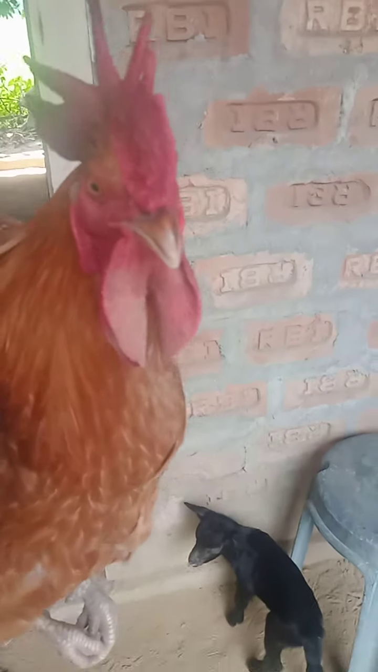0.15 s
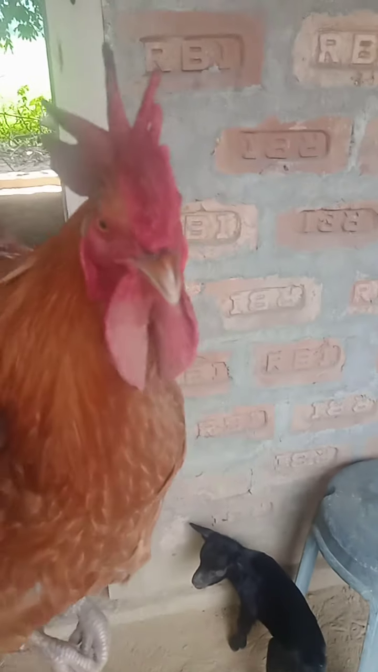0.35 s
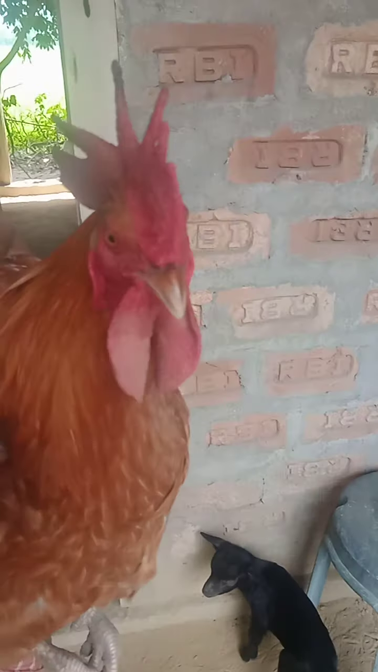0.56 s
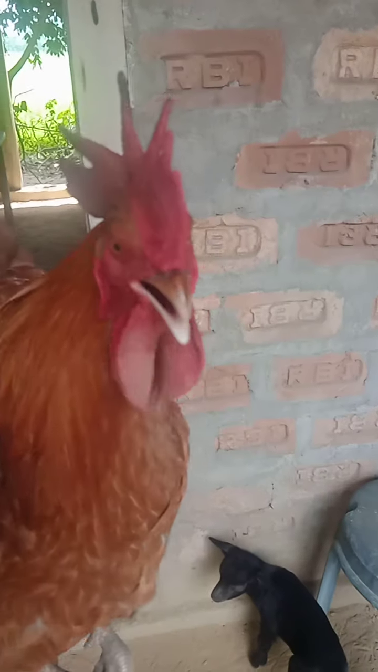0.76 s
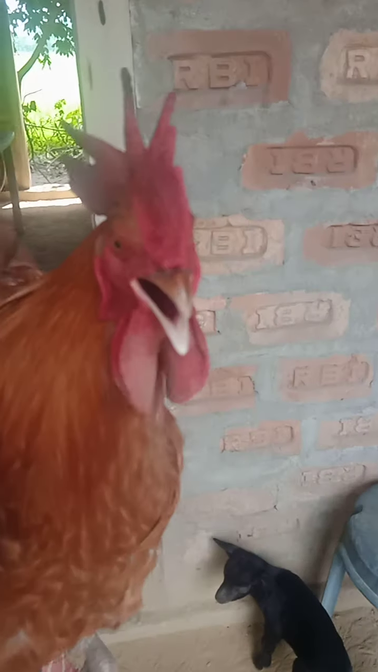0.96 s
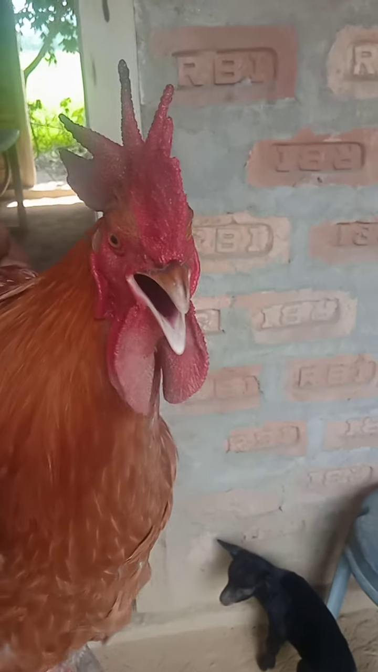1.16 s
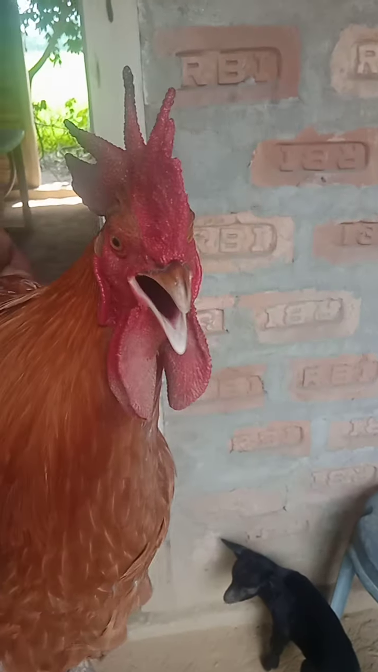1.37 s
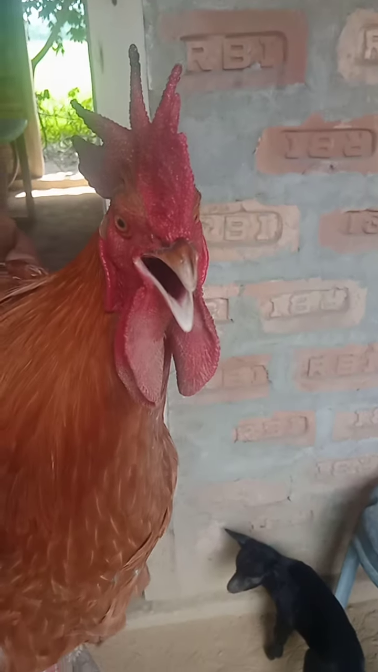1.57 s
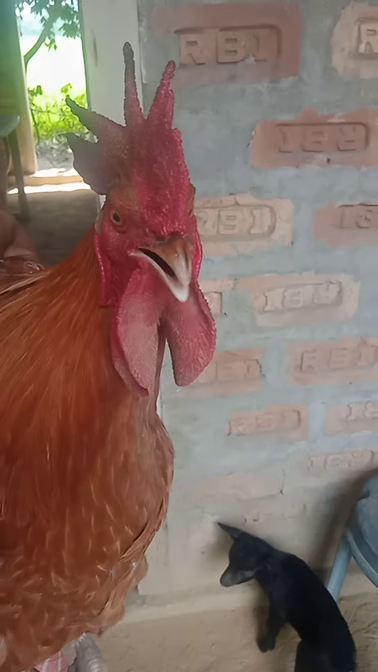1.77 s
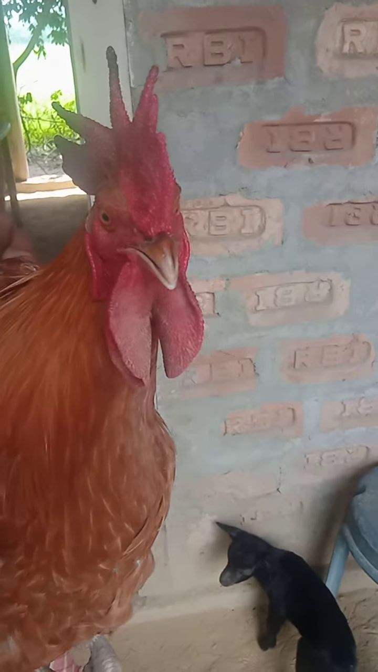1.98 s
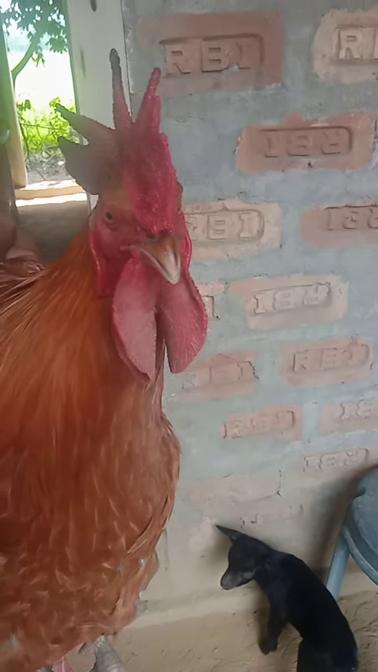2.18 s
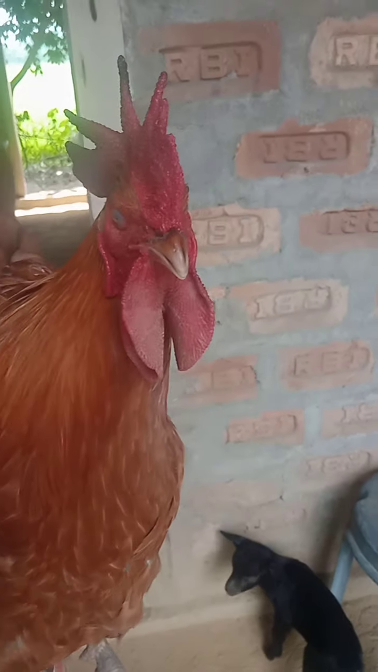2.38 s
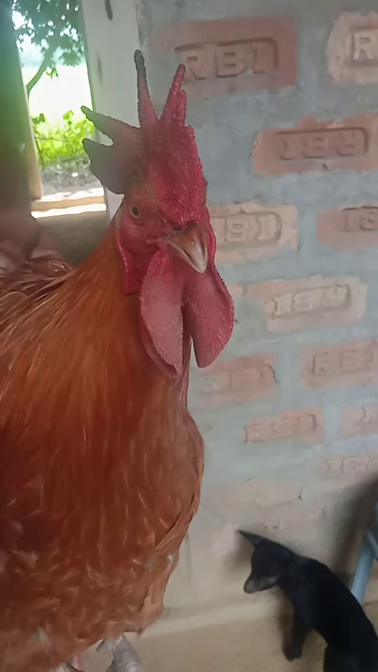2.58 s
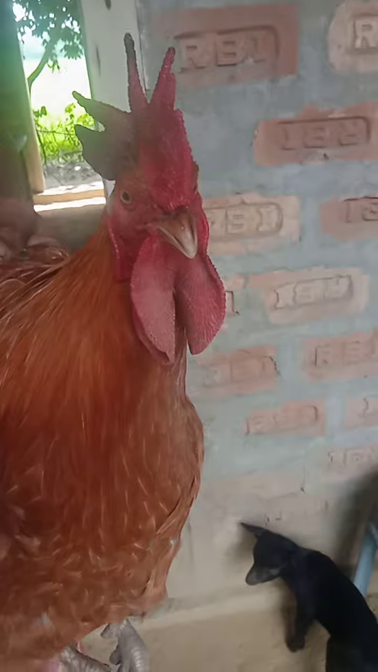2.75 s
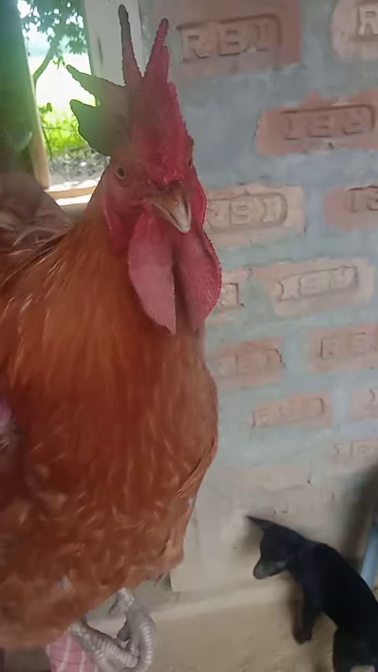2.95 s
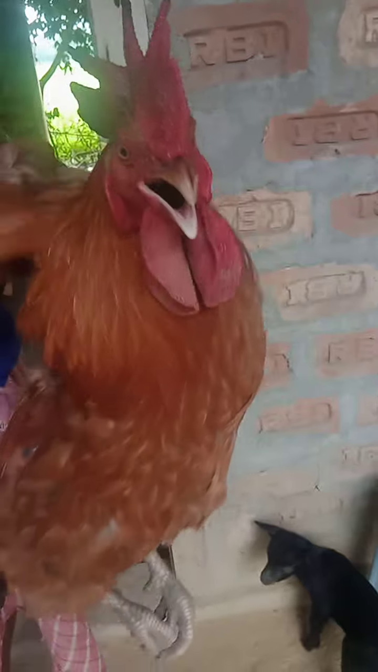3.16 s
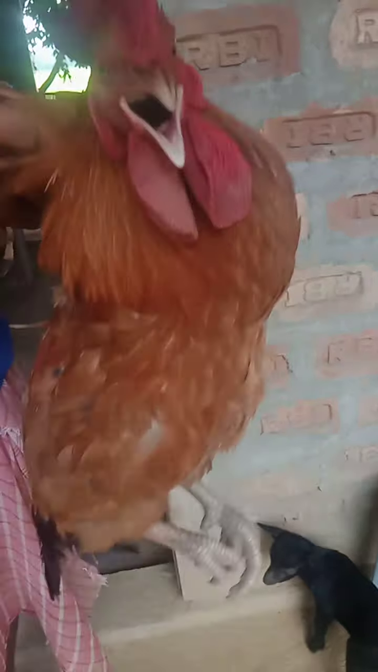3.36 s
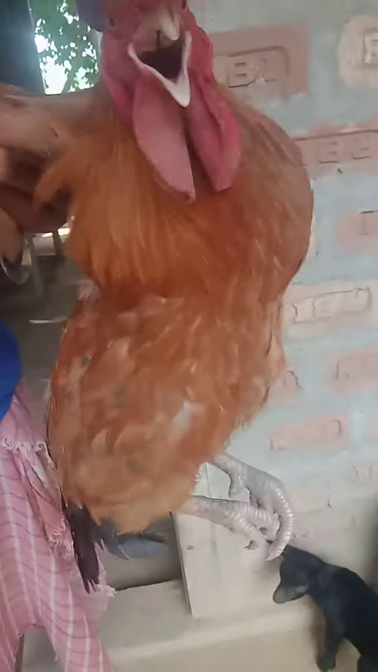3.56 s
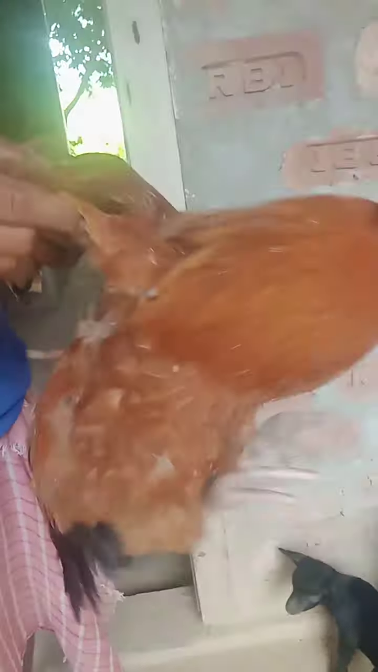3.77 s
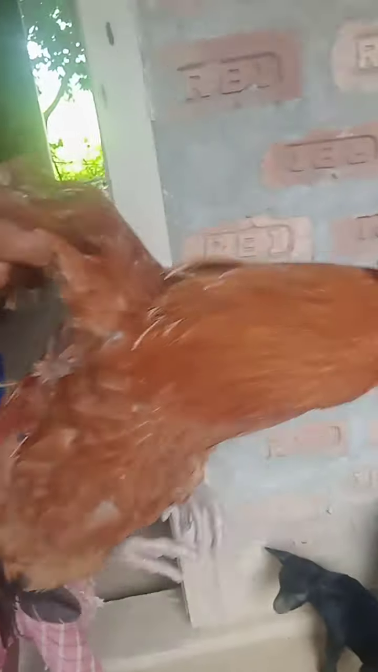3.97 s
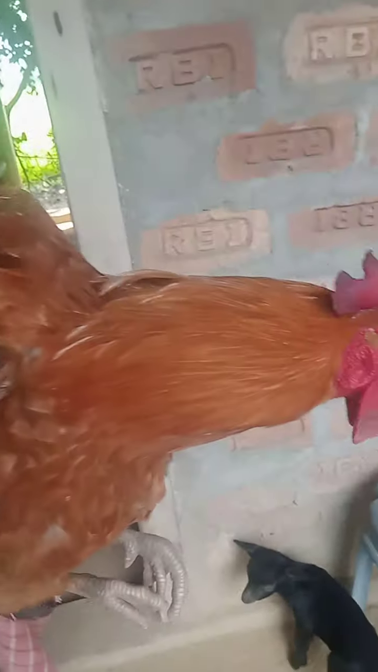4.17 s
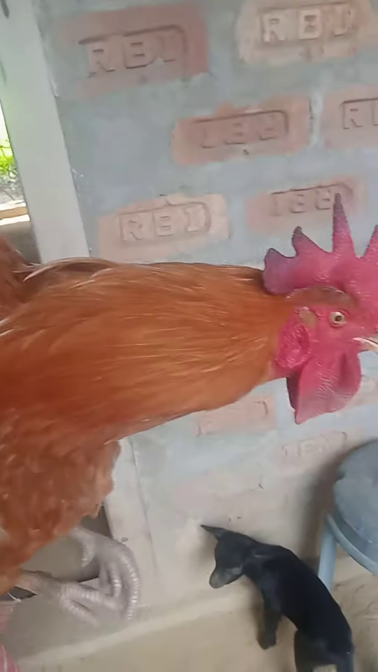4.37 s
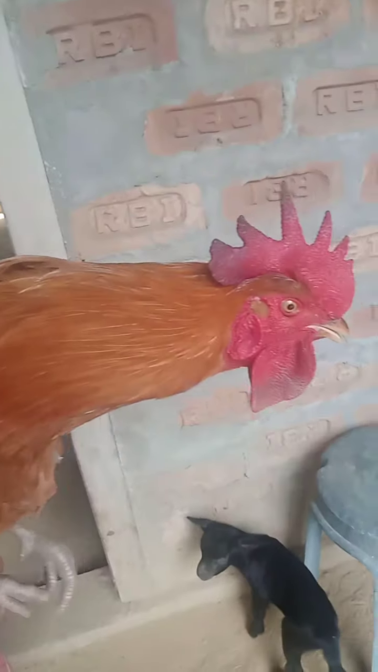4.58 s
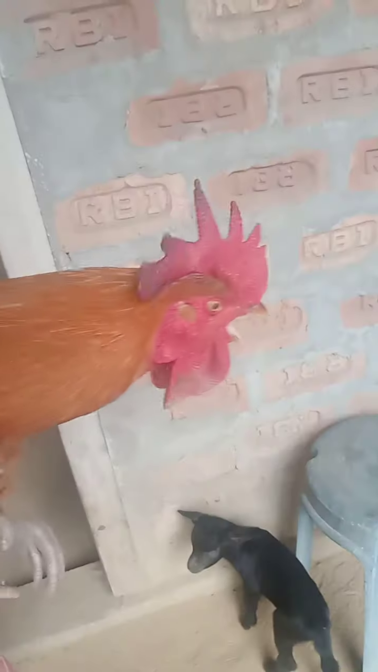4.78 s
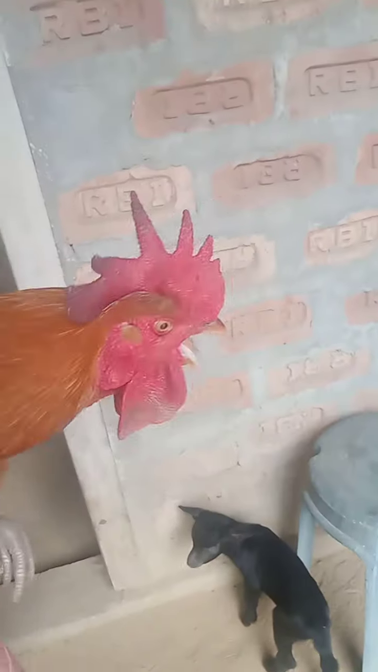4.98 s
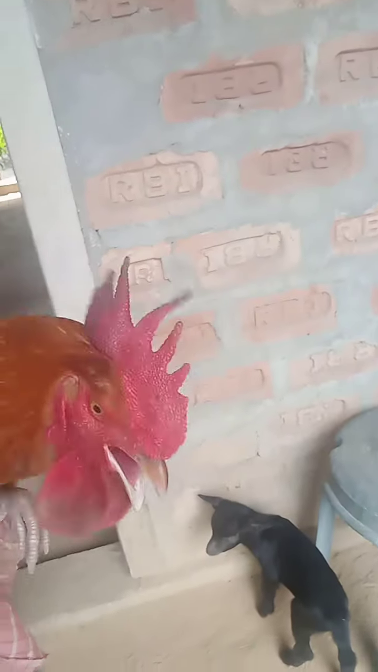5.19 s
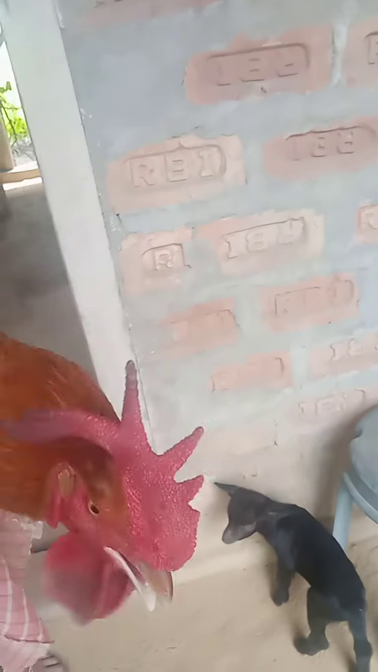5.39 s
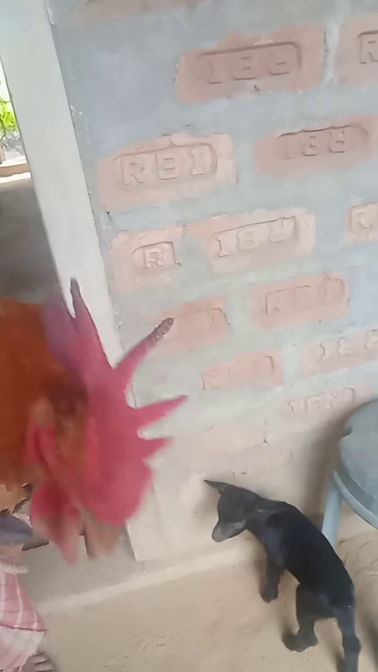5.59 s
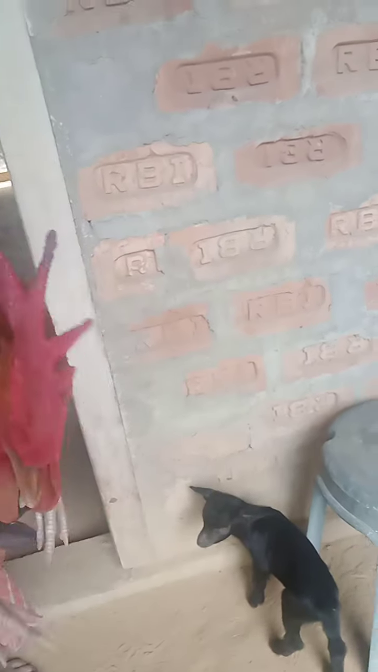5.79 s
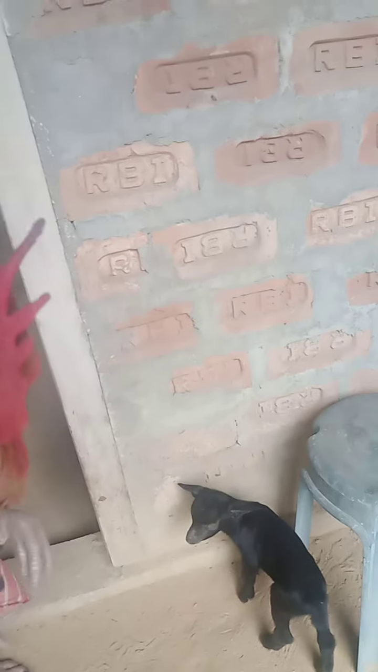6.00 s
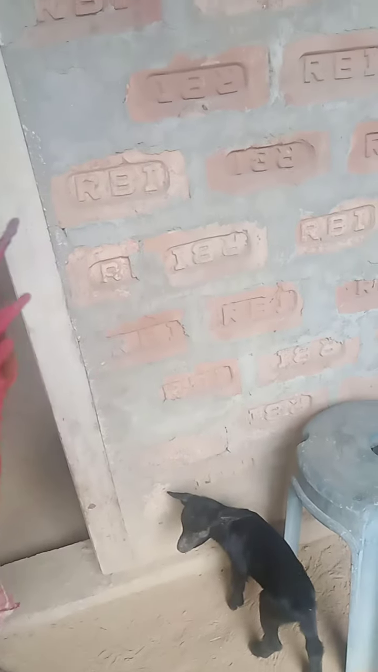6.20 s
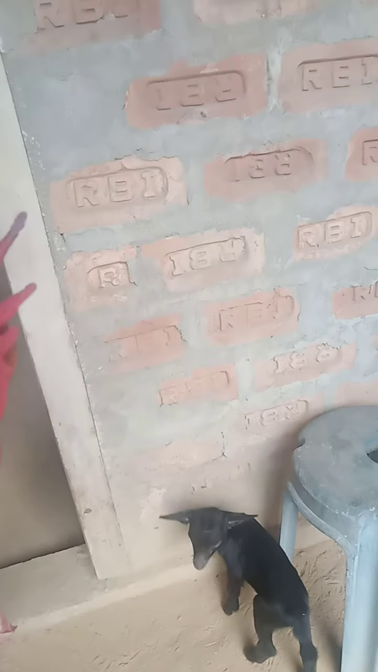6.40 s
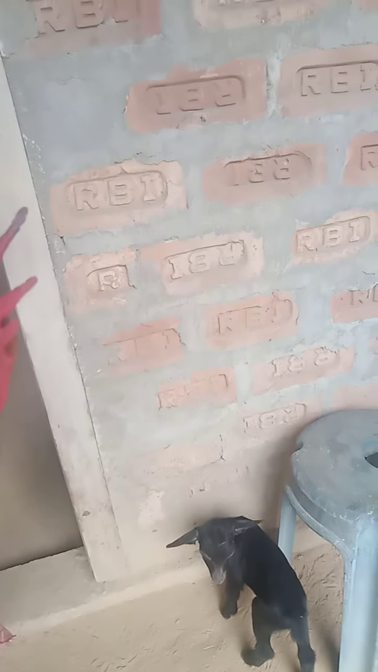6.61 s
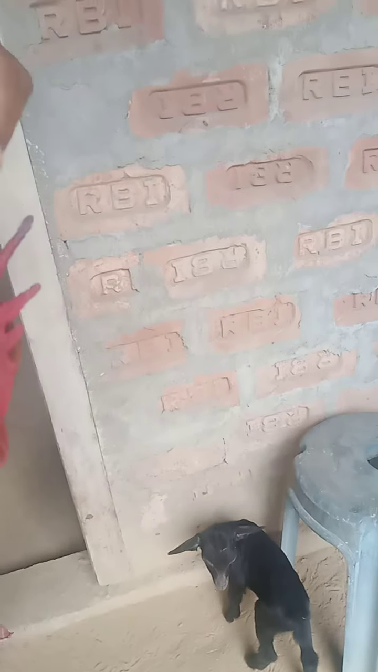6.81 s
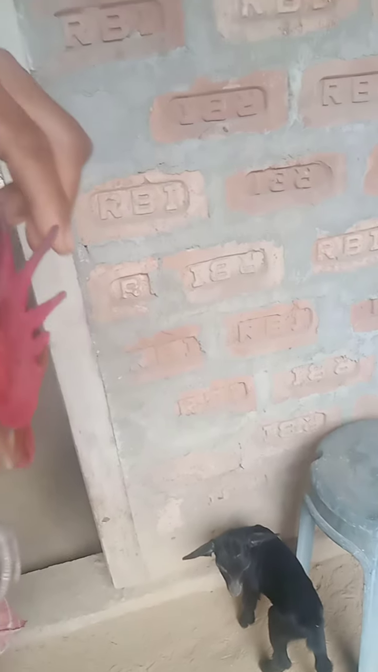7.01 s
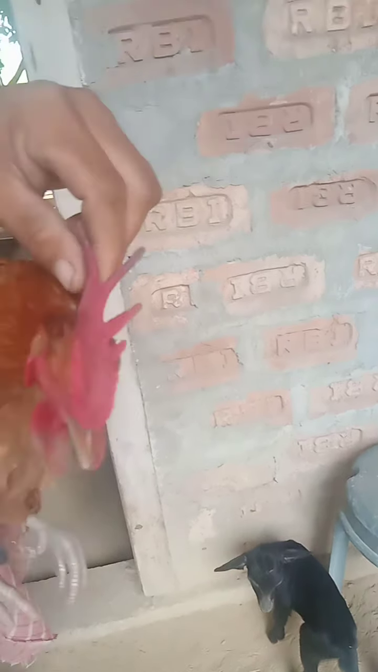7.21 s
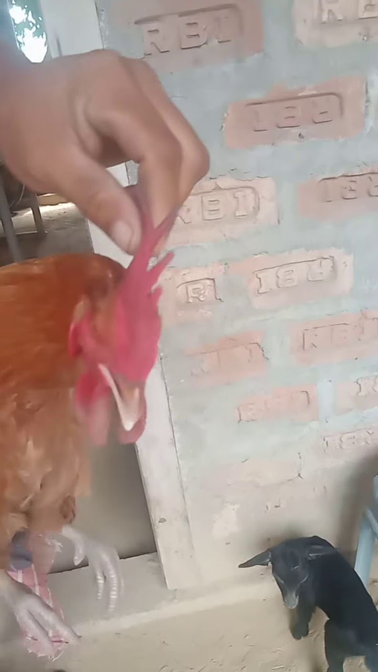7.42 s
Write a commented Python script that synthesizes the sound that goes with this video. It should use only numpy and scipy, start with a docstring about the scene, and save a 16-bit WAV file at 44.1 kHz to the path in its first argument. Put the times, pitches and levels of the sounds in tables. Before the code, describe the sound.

Quiet yard with soft steady hiss and a close, dry microphone with slight wall echo. A low hen grumble and a short distant quack lead into a rooster's strained, buzzing squawk. Three nasal quacks follow, then a higher, breaking double squawk, a grumble, and two further squawks shifting between clear tone and hoarse rasp. Dull thumps and finger rubbing on the microphone come between and at the end.

```python
"""Place: a small yard beside a brick wall, a rooster held close to the microphone.
A hen grumbles farther off, the beak clicks and a duck quacks just before the first long squawk; three more
quacks follow, then three more squawks, the second of the four breaking in two, with hen grumbles between.
The rooster flips between clear harmonics, period-doubled slaps and chaotic rasp; the birds echo off the walls.
Bumps and rubbing on the microphone come in between and last, over quiet coloured noise of the yard."""
import sys
import numpy as np
from scipy import signal
from scipy.fft import rfft, irfft, next_fast_len
from scipy.io import wavfile
from scipy.ndimage import uniform_filter1d

SR = 44100
rng = np.random.default_rng(int(sys.argv[2]) if len(sys.argv) > 2 else 0)


def wrap_up_sound(samples):
    """Save the sound to the file named by the first command line argument, as 16-bit audio."""
    columns = np.atleast_2d(samples).T
    # keep every value between -1 and 1, then stretch to whole-number steps
    tamed = np.clip(columns, -1, 1)
    steps = np.round(tamed * 32767).astype(np.int16)
    wavfile.write(sys.argv[1], SR, steps)


N = 328545
TIME = np.arange(N) / SR


def from_db(db):
    """Turn dB into an amplitude factor."""
    return 10 ** (np.asarray(db) / 20)


def rms_one(x):
    """Scale a signal to rms 1."""
    return x / np.sqrt(np.mean(x ** 2) + 1e-20)


def noise(size):
    """White noise of spread 1."""
    return rng.standard_normal(size)


def butterworth(x, order, edges_hz, kind):
    """Pass one range of frequencies."""
    return signal.sosfilt(signal.butter(order, edges_hz, kind, fs=SR, output="sos"), x)


def in_time(rows, t):
    """Each column of a curve at the times t."""
    row_times, *columns = np.transpose(rows)
    return [np.interp(t, row_times, column) for column in columns]


def at_hz(points, hz, axis=1):
    """A column of a spectrum, joined on a log-frequency axis."""
    points = np.array(points)
    return np.interp(np.log(np.maximum(hz, 1)), np.log(points[:, 0]), points[:, axis])


def drift(rate_hz, size):
    """Smooth random wandering of rms 1: noise through two equal low-pass poles."""
    pole = np.exp(-2 * np.pi * rate_hz / SR)
    wander = signal.lfilter([1], [1, -2 * pole, pole * pole], noise(2 * size))
    return rms_one(wander[size:])   # the second half only, after the filter's start


def colour(x, *spectra):
    """Causal (minimum-phase) filter whose amplitude gain is the sum of the spectra's."""
    size = 2 * next_fast_len(len(x))
    hz = np.arange(size // 2 + 1) * SR / size
    gain = sum(from_db(at_hz(spectrum, hz)) for spectrum in spectra)
    # folding the cepstrum onto positive times makes the phase minimum
    cepstrum = irfft(np.log(gain))
    cepstrum[1:size // 2] *= 2
    cepstrum[size // 2 + 1:] = 0
    return irfft(rfft(x, size) * np.exp(rfft(cepstrum)))[:len(x)]


def even(x, size=700):
    """Hold the level near rms 1 over a window in samples, keeping the grain of single pulses."""
    power = uniform_filter1d(uniform_filter1d(x ** 2, size), size)
    return x / np.sqrt(np.abs(power) + 1e-14)


def breath_span(start, end, attack_s=0.0038, release_s=0.0059):
    """Sample indices of a call and its soft on-off gate."""
    first = max(int((start - attack_s) * SR), 0)
    at = np.arange(first, min(int((end + release_s) * SR), N))
    rise = (TIME[at] - start) / attack_s
    fall = (end - TIME[at]) / release_s
    return at, np.clip(np.minimum(rise, fall) + 1, 0, 1) ** 2


# the near rooster's pitch, one curve a squawk, two for the broken one: t/s, f/Hz
SQUAWK_PITCH = [
    [(0.735, 546.5), (0.85, 565.3), (0.95, 557.1), (1.05, 559.7), (1.27, 564.2), (1.41, 572.3),
     (1.65, 550.4), (1.76, 530.8), (1.81, 456)],
    [(3.035, 663.8), (3.125, 691.6), (3.17, 589), (3.24, 603), (3.33, 623.5), (3.4, 633.6), (3.48, 682.4),
     (3.55, 669.3), (3.635, 626.4), (3.67, 641), (3.688, 727), (3.72, 685.7)],
    [(3.73, 706), (3.765, 704.5), (3.81, 720), (3.9, 742), (3.94, 739), (3.98, 598.2), (4.05, 636),
     (4.12, 618.3)],
    [(4.73, 596), (4.78, 616), (4.818, 552), (4.87, 578), (5.045, 587.1), (5.125, 628.3), (5.155, 631.7),
     (5.165, 649.6), (5.205, 673.4), (5.24, 636.4), (5.38, 626.7), (5.412, 726), (5.432, 702.6),
     (5.455, 576)],
    [(5.99, 571.2), (6.1, 617.5), (6.32, 626), (6.46, 629.4), (6.6, 611), (6.68, 584), (6.735, 512.6),
     (6.775, 421.4)],
]
# its effort while the breath is held, same order: t/s, core level/dB, middle level/dB, top level/dB
SQUAWK_EFFORT = [
    [(0.74, -17.5, -29, -24.5), (0.754, -29, -30.5, -37), (0.76, -22.5, -25.5, -27.5),
     (0.79, -18.5, -23.5, -34), (0.878, -19.5, -19.5, -21.5), (1.426, -23.5, -17, -19),
     (1.654, -22.5, -16, -21), (1.67, -19, -20.5, -21), (1.786, -18.5, -18.5, -23),
     (1.803, -16.5, -20.5, -32)],
    [(3.04, -45.5, -61, -62.5), (3.06, -37.5, -48, -49.5), (3.102, -43.5, -53.5, -56),
     (3.118, -16, -17.5, -20), (3.15, -20, -25.5, -29), (3.444, -21.5, -16.5, -14.5),
     (3.552, -29, -23, -16), (3.64, -10, -14, -18), (3.708, -24.5, -20.5, -11.5), (3.72, -30, -22.5, -31.5)],
    [(3.73, -31, -35, -39), (3.756, -38, -21, -18.5), (3.774, -17.5, -28, -26), (3.842, -22.5, -17, -16.5),
     (3.928, -19, -15.5, -21), (3.962, -23, -20.5, -22), (3.972, -14.5, -23, -32), (3.99, -26, -28, -36.5),
     (4.098, -23.5, -35, -39.5), (4.115, -37, -41, -40)],
    [(4.735, -17.5, -24.5, -30), (4.875, -17.5, -16.5, -21.5), (5.029, -9.5, -18, -25),
     (5.059, -10.5, -25, -31.5), (5.073, -21.5, -15.5, -20), (5.147, -6.5, -27.5, -25.5),
     (5.195, -20.5, -17, -19), (5.365, -16, -16, -20.5), (5.423, -21, -16.5, -16),
     (5.45, -14.5, -50, -21.5)],
    [(5.992, -22, -41.5, -37.5), (5.998, -17.5, -32.5, -24.5), (6.162, -10.5, -27, -24),
     (6.318, -15.5, -21.5, -23.5), (6.33, -10, -23.5, -28), (6.416, -9, -21.5, -24),
     (6.682, -14.5, -25.5, -30.5), (6.714, -17.5, -12, -25), (6.75, -23.5, -21.5, -22),
     (6.77, -18.5, -42.5, -56)],
]
# harmonics of its clear tone before the throat's glide, same order: multiple of the pitch, level/dB
SQUAWK_HARMONICS = [
    [(1, -17), (2, 1), (3, -15), (4, -1.5), (5, -10.5), (6, -18.5), (7, -11), (8, -17.5), (9, -21.5),
     (10, -20), (11, -16), (12, -22.5), (13, -20.5), (14, -35)],
    [(1, -29.5), (2, -3), (3, -16), (4, 3.5), (5, 5), (6, -0.5), (7, -2.5), (8, -9), (9, -7), (10, -7.5),
     (11, -4.5), (12, -10.5), (13, -43), (14, -20)],
    [(1, -9.5), (2, -0.5), (3, -4.5), (4, -0.5), (5, -5), (6, -9.5), (7, -27.5), (8, -9.5), (9, -35),
     (10, -5.5), (11, -8), (12, -18.5)],
    [(1, -18.5), (2, 6), (3, -23), (4, -4), (5, -12), (6, -17.5), (7, -28), (8, -28), (9, -37.5), (10, -21),
     (11, -19.5), (12, -27.5), (13, -30), (14, -42)],
    [(1, -24), (2, -0.5), (3, -33.5), (4, -15.5), (5, -17.5), (6, -21.5), (7, -18), (8, -27), (9, -27),
     (10, -28.5), (11, -32.5), (12, -24.5), (13, -40.5), (14, -35.5)],
]
# resonances of its throat and beak, same order: f/Hz, level/dB
SQUAWK_THROAT = [
    [(100, -69.5), (170, -42.5), (762, -11.5), (830, 0.5), (935, -4), (1090, -0.5), (1270, -1.5),
     (1480, -13), (1980, -16), (2270, -6), (3190, -10.5), (3920, -13), (5510, -22.5), (6000, -13),
     (10000, -46), (13000, -71.5), (22000, -120)],
    [(100, -74.5), (170, -35), (372, -17.5), (688, -16), (873, -11), (935, -10), (1230, 4), (1640, -17.5),
     (2350, -17), (2690, -24.5), (3470, -3), (4260, -12.5), (5060, -19.5), (7230, -17), (10000, -50),
     (13000, -89), (22000, -120)],
    [(150, -80), (250, -41), (703, -14), (821, -7), (1120, -10), (1240, 4), (1370, -12.5), (1450, -3),
     (1590, -5), (2010, -20.5), (2950, 8.5), (4480, -15), (5560, -13.5), (7340, -5.5), (10000, -33.5),
     (13000, -51), (22000, -120)],
    [(100, -80.5), (170, -44), (243, -45.5), (449, -38.5), (775, -18.5), (935, -17.5), (1250, 0.5),
     (1590, -24), (2390, -10), (2830, -7.5), (3300, -7.5), (3720, -12.5), (4800, -21), (6640, -17.5),
     (10000, -54), (13000, -65.5), (22000, -120)],
    [(120, -89), (200, -75), (543, -33.5), (629, -36.5), (844, -23), (1040, -17), (1250, -7), (1520, -27.5),
     (2150, -23.5), (2490, -6.5), (3030, -14), (3510, -12.5), (4710, -26), (7090, -22.5), (10000, -48.5),
     (13000, -81.5), (22000, -120)],
]


def rooster():
    """Close to the microphone: the long squawks and, as the bird struggles, a second note."""
    calls = zip(SQUAWK_PITCH, SQUAWK_EFFORT, SQUAWK_HARMONICS, SQUAWK_THROAT)
    return sum(squawk(*call) for call in calls) + second_voice()


# sizzle that the rasp adds to the throat: f/Hz, level/dB
RASP_SIZZLE = [(6500, -80), (9500, -43.5), (12000, -57.5), (13500, -51.5), (15000, -43), (16000, -52)]
# brief cracks of the clear tone: centre t/s, length/s, rasp share (0-1) added above the core
VOICE_CRACKS = [(5.165, .005, .3), (6.463, .006, .9), (6.603, .008, .95), (6.645, .006, .9)]


def squawk(pitch_rows, effort, harmonics, throat):
    """Clear tone and rasp share the power of the breath in each register."""
    at, gate = breath_span(effort[0][0], effort[-1][0], attack_s=.016, release_s=.02)
    t = TIME[at]
    since_onset = t - t[0]
    pitch, = in_time(pitch_rows, t)
    levels = in_time(effort, t)
    core, upper, chaos = syrinx(t)

    crack = sum(share * np.exp(-((t - s) / length) ** 2) for s, length, share in VOICE_CRACKS)
    core, upper = np.clip([core + 0.045 * crack, upper + crack], 0, 1)
    # a crack throws energy from the core into the upper registers
    levels = levels + np.outer([-3.0, 8.0, 7.0], crack)   # dB

    # the pitch trembles as the voice roughens and wanders in a full rasp
    tremble = (0.0012 + .009 * upper * chaos) * drift(110, len(t))
    wander = .008 * core * chaos * drift(18, len(t))
    cycles = np.cumsum(pitch * (1 + tremble + wander)) / SR
    tone = clear_tone(cycles, pitch, harmonics, throat, flutter_db=1.5, pull=0.8)

    # the rasp comes in uneven spurts, deeper in chaos
    spurts = from_db(2.1 * chaos * drift(70, len(t)))
    source = spurts * slaps(cycles, chaos, jitter=.15, shimmer_db=5.5, air=0.41)
    rasp = colour(source, throat, RASP_SIZZLE)

    voice = 0
    shares = (core, upper, upper)
    for clear, rough, share, db in zip(registers(tone), registers(rasp), shares, levels):
        mix = np.sqrt(1 - share) * even(clear) + np.sqrt(share) * even(rough)
        voice = voice + from_db(db) * even(mix)

    # until the beak is wide open the rasp also sounds low through the neck
    neck = even(butterworth(source, 2, [300, 520], "band"))
    voice = voice + neck * core * from_db(levels[0] - 14.5) * np.exp(-since_onset / 0.087)
    # the voice stutters while it catches
    stutter_db = 4.0 * np.exp(-since_onset / 0.14) * np.clip(drift(68, len(t)), -2, 1.2)
    out = np.zeros(N)
    out[at] = gate * from_db(stutter_db) * voice
    return out


# states of the syrinx: rasp share of the core (0-1), rasp share above it (0-1), irregularity (0-1)
CLEAR = (.001, 0.0016, 0.77)
BUZZ = (0.072, 0.05, 0.099)   # faint half-tones between the harmonics
DOUBLED = (0.046, 0.21, 0.048)   # clean half-tones, with a larger share above the core
GROWL = (0.95, 0.73, 0.36)   # half-tones in a rasp
HOARSE = (0.15, 0.82, 0.61)   # a tone under a rasp
RASP = (.8, 0.94, .85)   # chaos
# flips of the voice from state to state: t/s, time to settle/s, new state (the three values above)
SYRINX_FLIPS = [(.7, .01, RASP), (.88, .15, GROWL), (1.26, 0.041, BUZZ), (1.652, 0.026, RASP),
                (1.745, 0.018, HOARSE), (3.0, .01, HOARSE), (3.1, .012, RASP), (3.25, 0.067, HOARSE),
                (3.351, .05, DOUBLED), (3.467, 0.02, GROWL), (3.51, .06, DOUBLED), (3.673, 0.0084, RASP),
                (3.719, .03, DOUBLED), (3.789, .03, GROWL), (3.85, .05, RASP), (3.94, 0.11, HOARSE),
                (4.03, 0.081, DOUBLED), (4.7, .01, RASP), (4.8, 0.028, BUZZ), (4.84, 0.014, CLEAR),
                (5.054, 0.026, RASP), (5.102, 0.01, CLEAR), (5.16, 0.017, DOUBLED), (5.201, 0.016, RASP),
                (5.386, 0.027, BUZZ), (5.95, 0.0081, RASP), (6.039, 0.072, HOARSE), (6.305, 0.044, CLEAR),
                (6.69, 0.073, BUZZ)]


def syrinx(t):
    """The state at the times t: each flip of the membranes settles into a new state and holds it."""
    state = np.zeros((3, len(t)))
    for s, settle_s, new in SYRINX_FLIPS:
        settled = np.clip((t - s) / settle_s, 0, 1)
        state = state + settled * (np.array(new)[:, None] - state)
    return np.clip(state, 0, 1)


# harmonics beyond the listed ones, against the last of them: f/Hz, level/dB
HIGH_OVERTONES = [(8000, 0), (10000, -9), (11500, -15.5), (13500, -21.5), (15000, -8.5)]


def clear_tone(cycles, pitch, harmonics, throat, flutter_db, pull):
    """A stack of fluttering harmonics that swell and fade as they glide through the throat's resonances."""
    out = 0
    for k in range(1, 27):
        db = harmonics[min(k, len(harmonics)) - 1][1]
        if k > len(harmonics):
            db = db + at_hz(HIGH_OVERTONES, k * pitch)
        glide_db = at_hz(throat, k * pitch) - at_hz(throat, k * np.median(pitch))
        db = db + pull * np.clip(glide_db, -10, 10) + flutter_db * drift(21.0, len(pitch))
        out = out + from_db(db) * np.cos(2 * np.pi * k * cycles)
    return out


def slaps(cycles, chaos, jitter, shimmer_db, air):
    """Membranes slap shut every other cycle; chaos scatters time and force and wakes the cycles between."""
    at = np.flatnonzero(np.diff(np.floor(cycles)))
    period = 1 / (cycles[at + 1] - cycles[at])   # samples
    late, strength = rng.standard_normal((2, len(at)))
    when = at + (np.ceil(cycles[at]) - cycles[at] + jitter * chaos[at] * late) * period
    force = from_db(shimmer_db * chaos[at] * np.clip(strength, -2, 2))
    force = force * np.where(np.arange(len(at)) % 2, chaos[at], 1)
    # a windowed sinc places each slap between samples
    taps = when.astype(int)[:, None] + np.arange(-7, 9)
    offset = taps - when[:, None]
    pulse = np.sinc(offset) * np.cos(np.pi * offset / 16) ** 2
    out = np.zeros(len(cycles))
    np.add.at(out, np.clip(taps, 0, len(out) - 1), force[:, None] * pulse)
    # air escapes in step with the membranes
    puffs = noise(len(out)) * (1 + np.cos(np.pi * cycles))
    return rms_one(out) + air * chaos * puffs


# borders between core, middle and top of the voice: f/Hz
REGISTER_BORDERS = [1600, 3200]


def registers(x):
    """Split into core, middle and top."""
    low, high = REGISTER_BORDERS
    bands = ((low, "low"), ([low, high], "band"), (high, "high"))
    return [butterworth(x, 6, edges, kind) for edges, kind in bands]


# a second, falling note as the bird struggles and its voice splits: t/s, f/Hz, level/dB
SECOND_NOTE = [(3.78, 1099, -39), (3.81, 1075, -17.5), (3.84, 998, -19.5), (3.866, 954, -36.5),
               (3.895, 854, -23.5), (3.934, 800, -21.5), (3.98, 686, -44)]
# its harmonics: multiple of the note, level/dB
SECOND_NOTE_HARMONICS = [(1, -1), (2, -14), (3, -4), (4, -11), (5, -31)]


def second_voice(tremble=0.011):
    """A shaky stack of harmonics, unrelated in pitch to the main voice."""
    at, gate = breath_span(SECOND_NOTE[0][0], SECOND_NOTE[-1][0])
    pitch, db = in_time(SECOND_NOTE, TIME[at])
    cycles = np.cumsum(pitch * (1 + tremble * drift(90, len(at)))) / SR
    note = 0
    for k, level in SECOND_NOTE_HARMONICS:
        flutter = from_db(level + 2.2 * drift(60, len(at)))
        note = note + flutter * np.cos(2 * np.pi * k * cycles)
    out = np.zeros(N)
    out[at] = gate * from_db(db) * rms_one(note)
    return out


# tiny click of the beak, relative level: t/s, level/dB
BEAK_SNAPS = [(0.6398, -43.5)]


def beak_clicks(t60=.012):
    """A bright snap of noise that dies at once."""
    snaps = 0
    for s, db in BEAK_SNAPS:
        decay_db = -60 * np.abs(TIME - s) / t60
        snaps = snaps + from_db(db - 7 + decay_db) * (TIME >= s)
    return butterworth(snaps * noise(N), 1, [1500, 12000], "band")


# quacks farther off, relative level: t/s, length/s, level/dB, f/Hz at mid-call
DUCK_QUACKS = [(.675, 0.072, -26, 329.3), (1.985, 0.13, -20.5, 325), (2.269, .11, -23, 308.7),
               (2.555, 0.089, -24.5, 285)]
# the duck's throat: f/Hz, level/dB
DUCK_RESONANCES = [(150, -63), (250, -21), (319, -18), (455, -35), (600, -29), (950, -31.5), (1270, -3.5),
                   (1650, -4), (1980, -2.5), (2500, -8.5), (3000, -23.5), (3500, -16), (4500, -13),
                   (5800, -21), (7500, -24), (12000, -70.5), (16000, -100)]


def duck():
    """Farther off: short quacks whose level and pitch arch strongly."""
    return far_fowl(DUCK_QUACKS, DUCK_RESONANCES, hoarse=.55, swell_db=7.0, arch=.055,
                    attack_s=.013, release_s=0.026)


# grumbles farther off, relative level: t/s, length/s, level/dB, f/Hz at mid-call
HEN_GRUMBLES = [(.072, .26, -31.5, 291.1), (2.945, 0.074, -60, 309.4), (4.125, 0.16, -30, 301.1),
                (4.61, 0.099, -56.5, 298)]
# the hen's throat: f/Hz, level/dB
HEN_RESONANCES = [(240, -78), (450, -34), (590, -8), (720, -2.5), (890, 0), (1190, 1.5), (1450, -8),
                  (1790, -2), (2100, 1.5), (2850, -18), (3300, -1), (4100, -24.5), (4600, -19.5),
                  (5400, -45), (7400, -16), (12000, -54), (16000, -90)]


def hen():
    """Farther off: grumbles of nearly flat level and pitch, with softer edges."""
    return far_fowl(HEN_GRUMBLES, HEN_RESONANCES, hoarse=.6, swell_db=1.5, arch=.008,
                    attack_s=.03, release_s=.03)


def far_fowl(calls, throat, hoarse, swell_db, arch, attack_s, release_s, waver=.008, flutter_db=1.5):
    """A nasal buzz mixed with uneven slaps, through a throat; level and pitch arch over each call and waver."""
    out = np.zeros(N)
    for s, length, db, hz in calls:
        at, gate = breath_span(s, s + length, attack_s, release_s)
        off_centre = np.minimum((2 * (TIME[at] - s) / length - 1) ** 2, 1)
        pitch = hz * (1 - arch * off_centre + waver * drift(14, len(at)))
        level_db = db - swell_db * off_centre + flutter_db * drift(22, len(at))
        # twice the pitch, as the regular slaps fall on every other cycle
        cycles = np.cumsum(2 * pitch * (1 + 0.0036 * drift(64.6, len(at)))) / SR
        buzz = slaps(cycles, np.zeros(len(at)), jitter=0, shimmer_db=0, air=0)
        rough = rms_one(slaps(cycles, np.ones(len(at)), jitter=0.3, shimmer_db=-1.5, air=0.89))
        out[at] += gate * from_db(level_db) * even(colour(buzz + hoarse * rough, throat))
    return out


# fingers rubbing on the microphone's case, relative level: t/s, length/s, level/dB
CASE_RUBBING = [(2.341, 0.22, -45.5), (5.865, 0.061, -31.5), (6.774, 0.048, -33), (7.038, 0.016, -28),
                (7.155, 0.29, -32)]
# colour of the rubbing: f/Hz, level/dB
CASE_RUB_COLOUR = [(18, -53), (30, -8), (81, 1.5), (167, -5), (269, -16.5), (350, -30), (516, -54),
                   (600, -54), (780, -75), (1320, -120)]


def handling(lumps_db=5.5, lumps_hz=18):
    """At the microphone itself: bumps and lumpy rubbing noise; it passes no deep bass."""
    lumps = from_db(lumps_db * np.clip(drift(lumps_hz, N), -2, 1.5))
    rub = even(colour(noise(N), CASE_RUB_COLOUR), size=1500) * lumps
    out = bumps(soft_hz=260, t60=0.014, level_db=8.5)
    for s, length, db in CASE_RUBBING:
        at, gate = breath_span(s, s + length, attack_s=0.013, release_s=0.026)
        out[at] += gate * from_db(db) * rub[at]
    return butterworth(out, 2, 55, "high")


# bumps on the microphone, relative peak level: t/s, level/dB, f/Hz
MICROPHONE_BUMPS = [(1.596, -46, 107), (2.359, -39, 75.4), (3.681, -19.5, 191), (4.707, -34.5, 108),
                    (5.74, -24, 161.4), (6.779, -27.5, 146), (7.168, -42.5, 140.8)]


def bumps(soft_hz, t60, level_db):
    """Each bump is a soft push: a sine swing that dies at once, with a little low rubbing noise."""
    out = np.zeros(N)
    t = TIME[:int(.08 * SR)]
    for s, db, hz in MICROPHONE_BUMPS:
        swing = np.sin(2 * np.pi * hz * t) * from_db(-60 * t / t60)
        rub = rms_one(butterworth(noise(len(t)), 2, [60, soft_hz], "band"))
        bump = swing + 0.23 * rub * from_db(-60 * t / 0.14)
        bump = from_db(db + level_db) * bump / np.abs(bump).max()
        start = int(s * SR)
        out[start:start + len(t)] += bump[:N - start]
    return out


# reverberation between the walls: f/Hz, time to fall 60 dB/s, level/dB
WALL_ECHO = [(300, 0.41, -1), (700, 0.41, 1.5), (1310, 0.38, 0.5), (2670, 0.37, -3), (5400, 0.51, -0.5),
             (8800, 0.15, -1), (14000, .2, -12)]


def walls(x, first_s=0.0076):
    """Dense echoes as bands of decaying noise, dying fastest in the high treble."""
    t = TIME[:int(.7 * SR)]
    edges = np.geomspace(150, 16000, 10)   # Hz
    echoes = 0
    for low, high in zip(edges, edges[1:]):
        hz = np.sqrt(low * high)
        band = butterworth(noise(len(t)), 2, [low, high], "band")
        decay = from_db(-60 * t / at_hz(WALL_ECHO, hz)) * (t > first_s)
        level = from_db(at_hz(WALL_ECHO, hz, axis=2))
        echoes = echoes + level * band * decay / np.linalg.norm(decay)
    return signal.fftconvolve(x, echoes)[:N]


# colour of the quiet yard: f/Hz, level/dB per Hz, relative
YARD_COLOUR = [(18, -47), (30, -23), (98, 0), (426, -16), (988, -13), (1220, -12), (1390, -14.5),
               (5040, -15.5), (6050, -11), (6550, -20.5), (7270, -5.5), (9220, -37), (13000, -42),
               (14800, -25), (16000, -44.5)]


def quiet_yard():
    """All around: soft coloured noise whose level drifts slightly."""
    return from_db(-63 + 0.86 * drift(4.4, N)) * rms_one(colour(noise(N), YARD_COLOUR))


def scene():
    """The near rooster is mostly direct sound with some echo, the far birds carry more; both channels are alike."""
    near, quacks, grumbles = rooster(), duck(), hen()
    direct = from_db(-0.54) * near + from_db(-10.0) * quacks + from_db(-7.5) * grumbles
    direct = direct + from_db(4) * beak_clicks()
    echoes = walls(from_db(-9) * near + from_db(-12) * quacks + from_db(-10.0) * grumbles)
    mono = direct + echoes + from_db(-10.0) * handling() + quiet_yard()
    return np.array([mono, mono])


def gain_control(x, lift_db=4.5, loud_db=-20.0, slope=0.53, release_db=271.0):
    """Quiet sound is lifted; the lift is taken back at once under a loud call and returns after it."""
    power = np.abs(uniform_filter1d(x[0] ** 2, size=260))
    level = 10 * np.log10(power + 1e-12)
    # the held level jumps up with a peak, then falls by at most release_db each second
    held = np.maximum.accumulate(level + release_db * TIME) - release_db * TIME
    lift = np.clip(slope * (loud_db - held), 0, lift_db)
    return x * from_db(uniform_filter1d(lift, size=130))


def record(dry):
    """Gain control acts, the highest peaks are rounded, deep bass and top are cut."""
    levelled = gain_control(dry)
    rounded = levelled / (1 + (levelled / .74) ** 6) ** (1 / 6)
    rounded = butterworth(rounded, 2, 45, "high")
    top_cut = signal.ellip(10, .1, 90, 15700, fs=SR, output="sos")   # steep, above 15.7 kHz
    return signal.sosfilt(top_cut, rounded)


dry = scene()
out = record(dry)
wrap_up_sound(out)
```